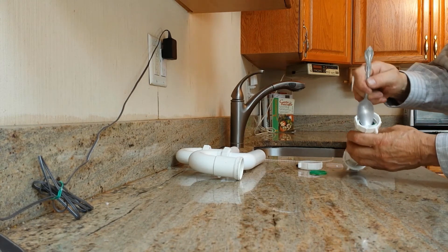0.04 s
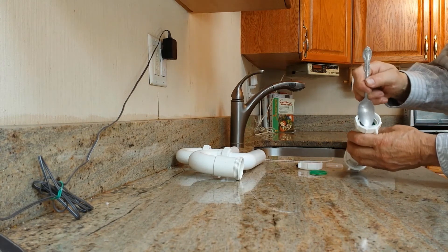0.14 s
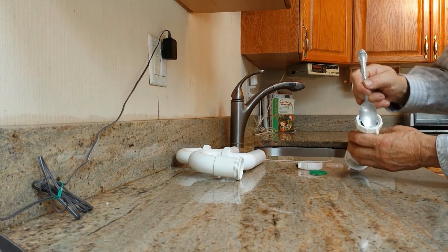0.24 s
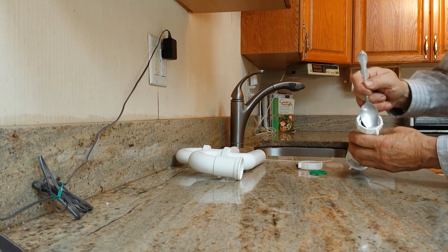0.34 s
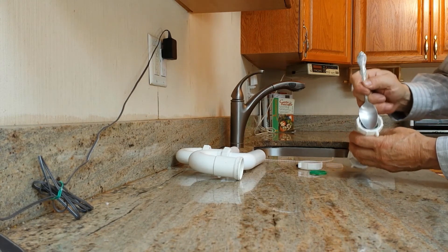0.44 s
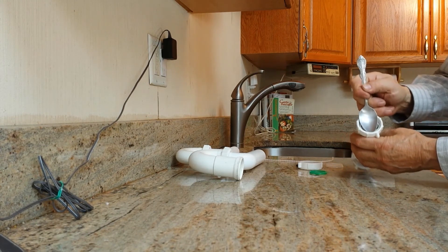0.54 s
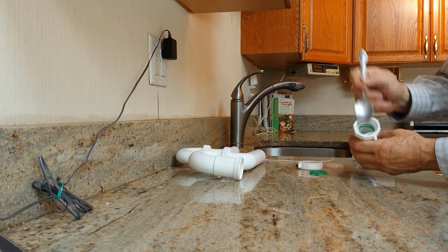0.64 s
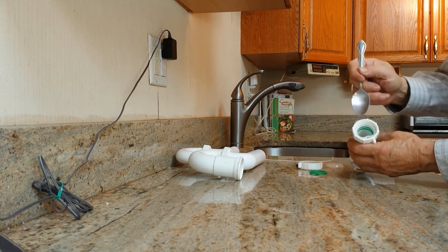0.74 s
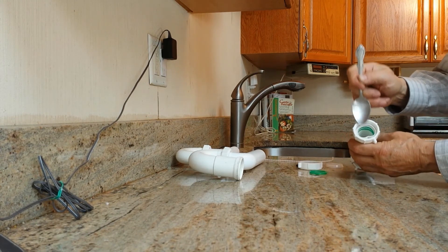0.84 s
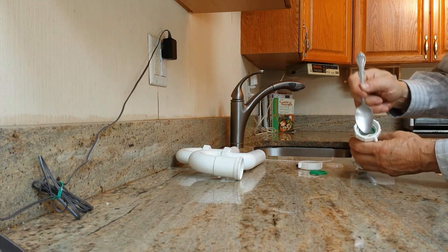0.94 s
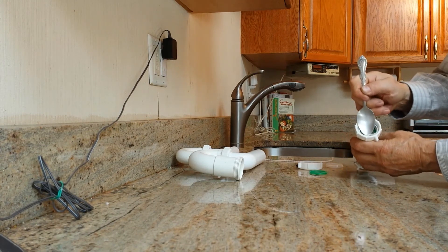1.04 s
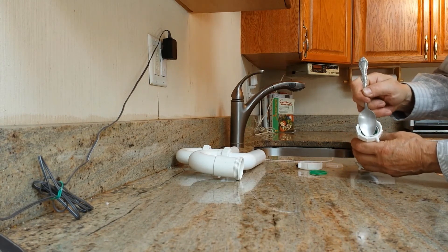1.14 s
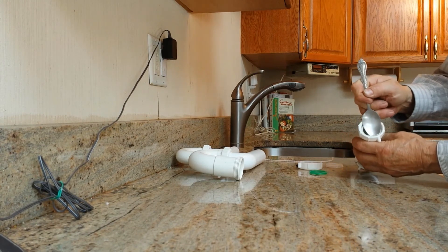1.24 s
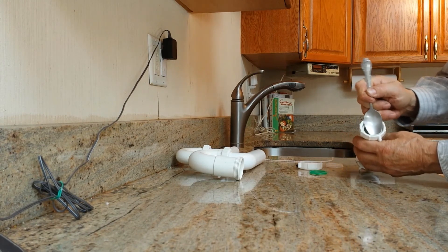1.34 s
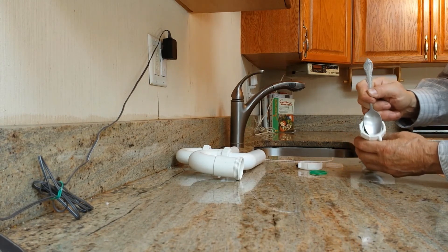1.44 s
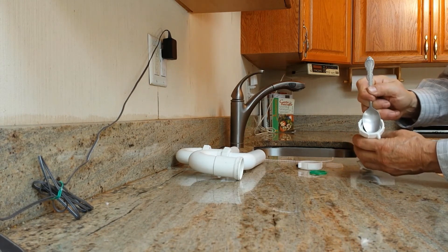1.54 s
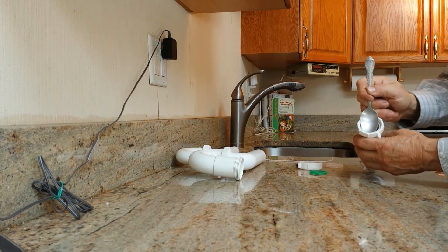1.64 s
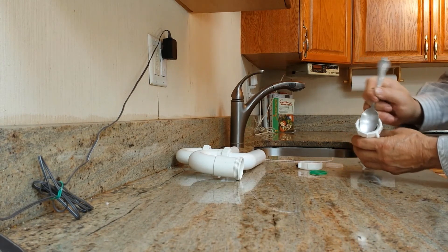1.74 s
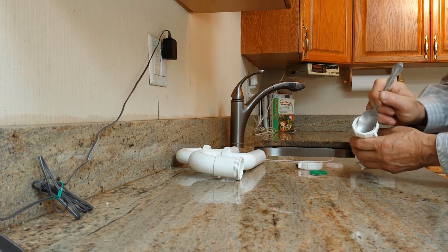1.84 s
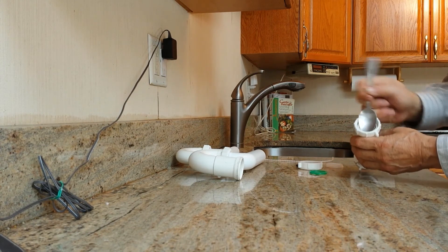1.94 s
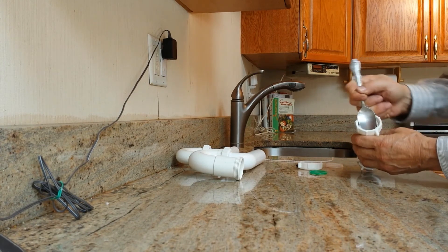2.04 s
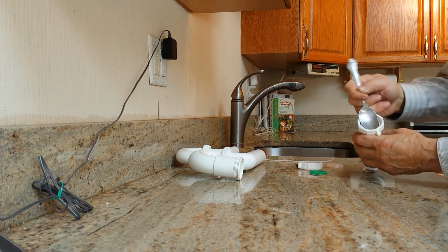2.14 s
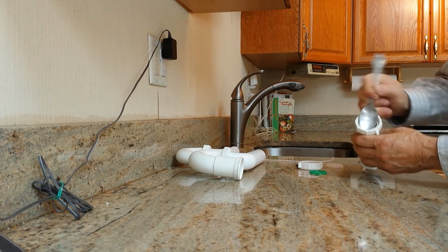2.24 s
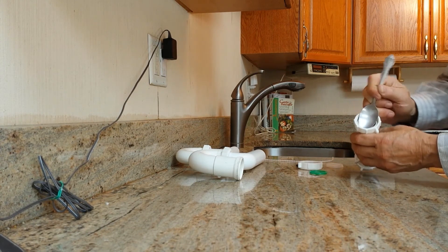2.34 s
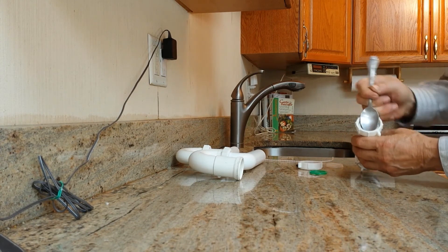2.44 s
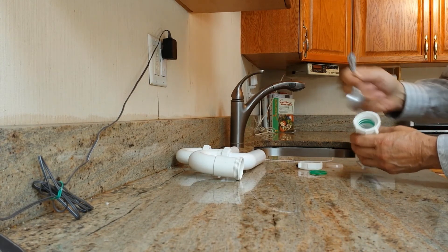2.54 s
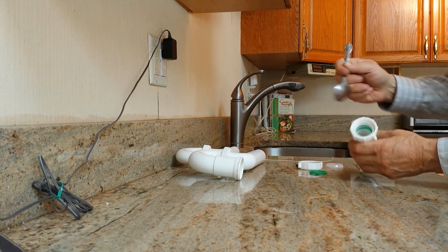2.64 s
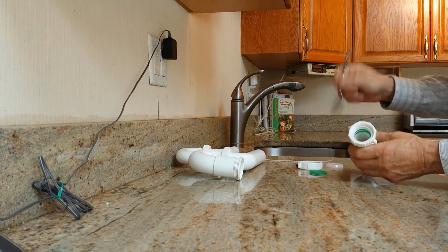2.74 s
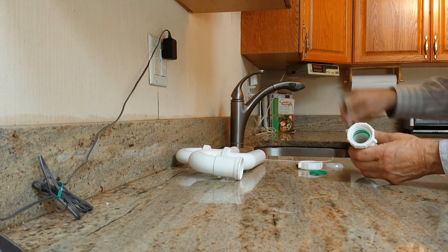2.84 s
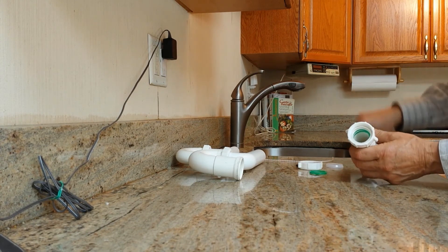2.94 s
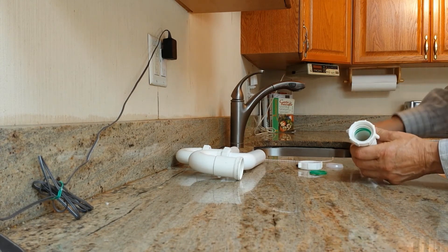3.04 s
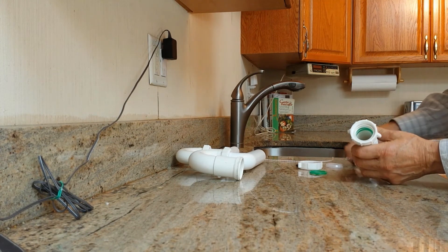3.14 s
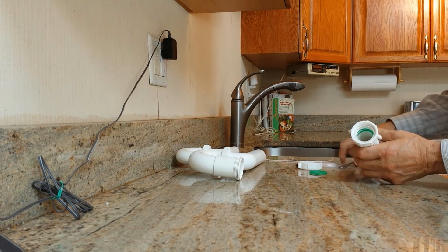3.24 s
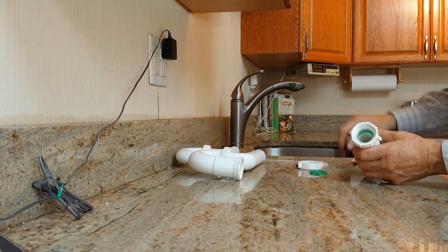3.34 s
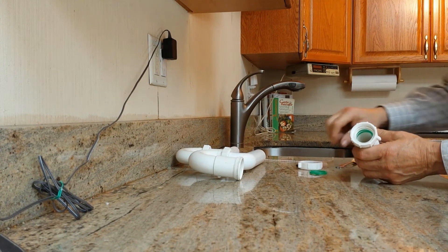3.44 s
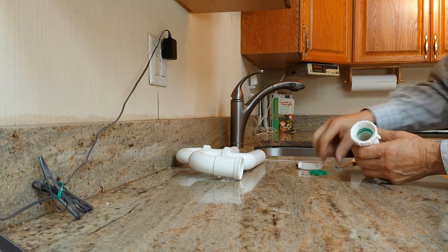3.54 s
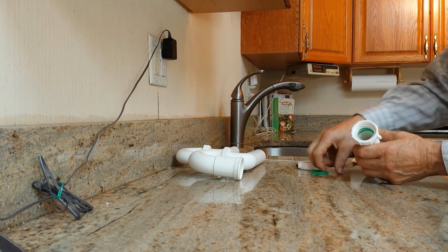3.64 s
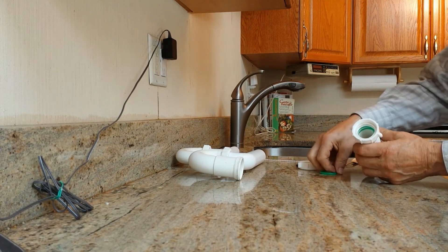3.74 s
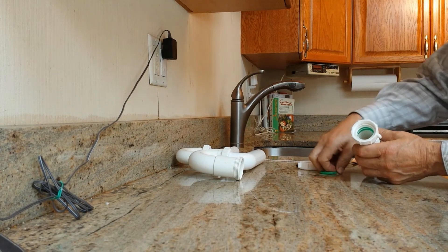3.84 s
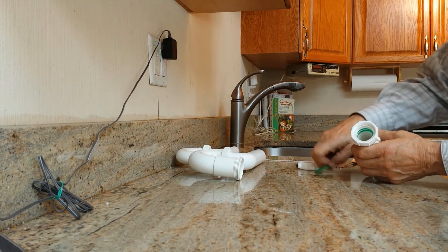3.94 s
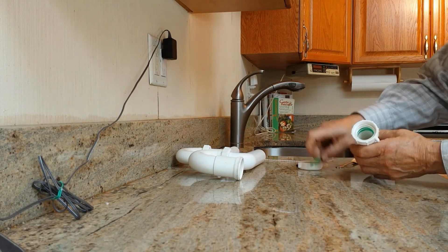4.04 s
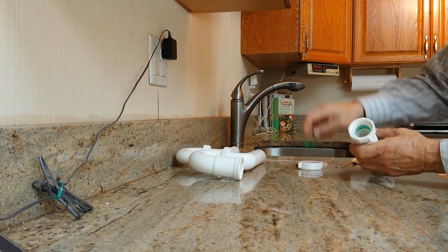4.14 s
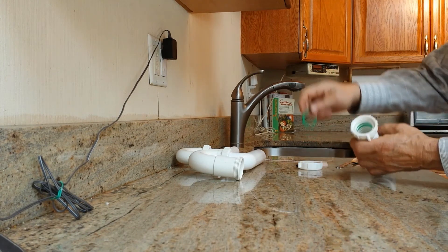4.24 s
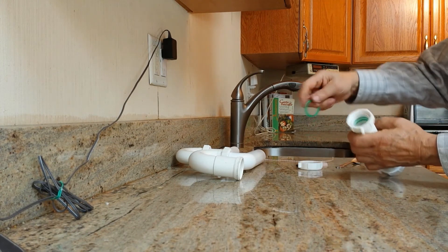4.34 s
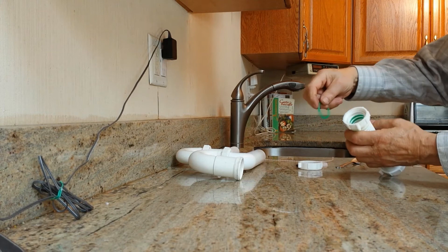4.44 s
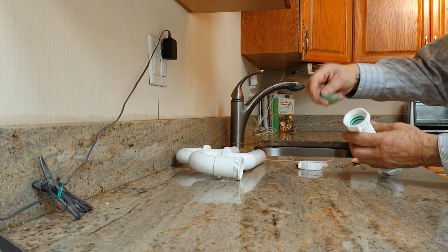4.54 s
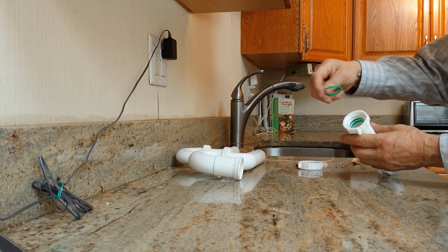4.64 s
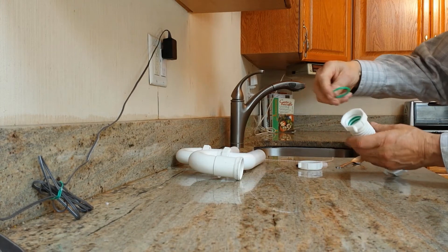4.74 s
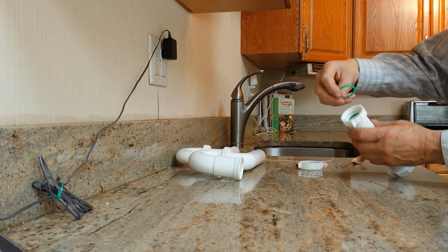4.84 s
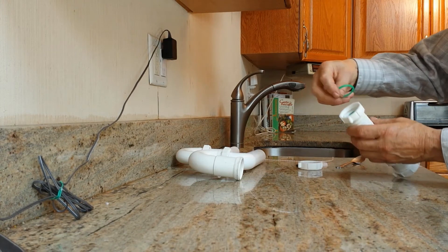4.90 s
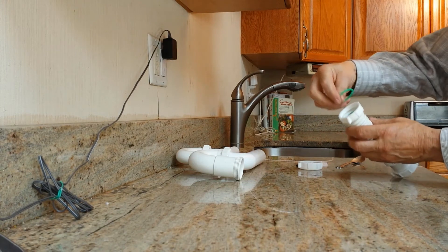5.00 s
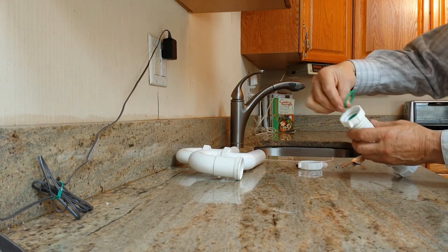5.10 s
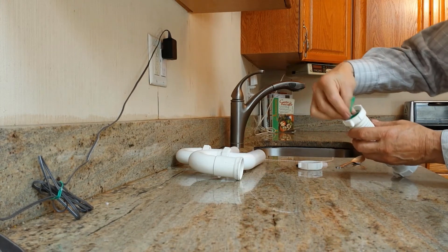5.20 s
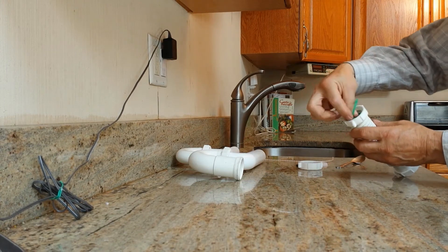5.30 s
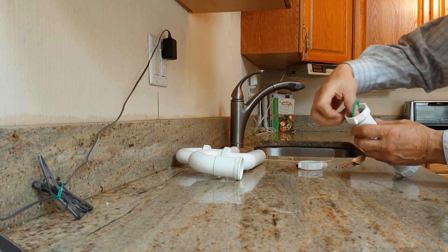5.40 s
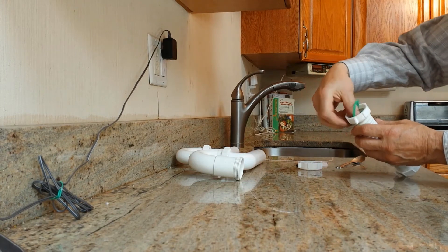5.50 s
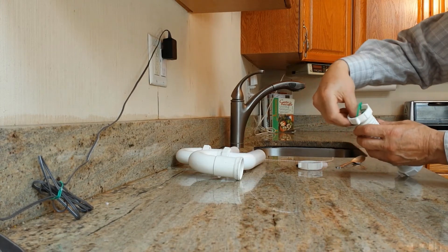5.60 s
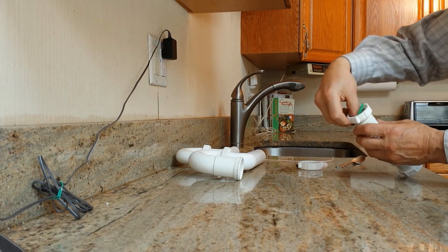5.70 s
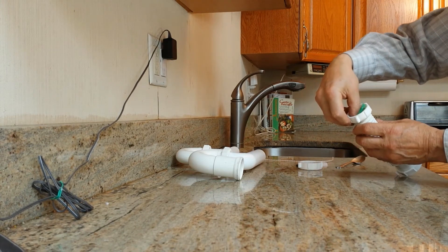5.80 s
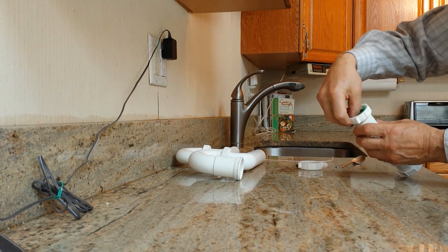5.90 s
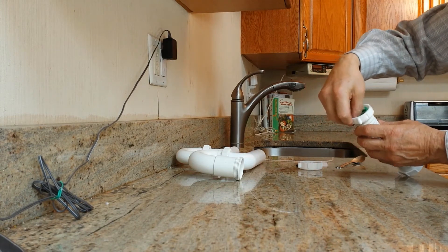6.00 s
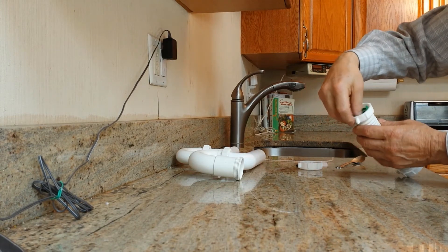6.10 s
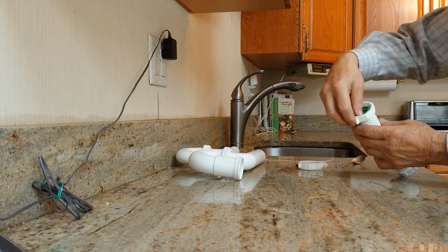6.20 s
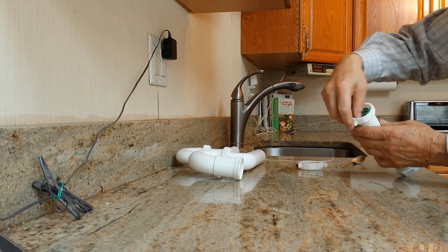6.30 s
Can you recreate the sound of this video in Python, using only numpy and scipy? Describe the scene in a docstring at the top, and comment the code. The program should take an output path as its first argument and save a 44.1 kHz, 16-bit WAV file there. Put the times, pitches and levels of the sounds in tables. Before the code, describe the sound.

Small plastic ticks and a sharp early click come from a hand-held pipe fitting, followed by boomy knocks and a snap. A steel spoon bounces on the stone counter, its rattle swelling and stopping quickly with a thin high ring. Sparse handling follows, then a hard, dry snap, the loudest sound. Short dense kitchen echoes, soft air noise and low appliance hum; microphones about a metre to the left.

```python
"""Granite kitchen counter, small hard room, a stereo pair of microphones about a metre to the left.
A spoon picks at the washer in a plastic drain fitting: tiny slips ring the plastic wall and the air in the pipe.
Dull knocks boom in a hollow body; the spoon, laid on the stone, bounces, rattles and rings as decaying sines.
Plastic snaps crack at once, loudest when the washer seats. Fingers tick faintly on the plastic.
Behind it all: dense echoes made of decaying noise, steady air noise and a low, wavering appliance hum."""
import sys
import numpy as np
from scipy import signal
from scipy.fft import rfft, irfft
from scipy.io import wavfile
from scipy.ndimage import uniform_filter1d

SR = 44100
rng = np.random.default_rng(int(sys.argv[2]) if len(sys.argv) > 2 else 0)


def inscribe(sig):
    """Save sig as 16-bit PCM at rate SR to the path in sys.argv[1].

    A 1-D sig is mono; a 2-D sig holds one channel per row.
    Samples are clipped to [-1, 1] before scaling.
    """
    pcm = np.round(np.clip(np.atleast_2d(sig).T, -1, 1) * 32767)
    wavfile.write(sys.argv[1], SR, pcm.astype(np.int16))


N = 280476  # length in samples
RING_T = np.arange(int(0.7 * SR)) / SR  # time axis of every ring and echo, s

# broad resonances of the plastic wall: f/Hz, width/Hz
LOW_WALL, HIGH_WALL = (2230, 1500), (5790, 2060)

# taps on the fitting: t/s, level/dB, brightness/(dB per octave), air ring f/Hz, air ring level/dB re the tap
FITTING_TAPS = [(0.258, -28.5, -6, 1600, -10), (0.4581, -23.5, 3, 1560, -21), (0.5179, -9, 4, 767, -17),
                (0.5187, -2, 1.5, 1537, -7.5), (0.9445, -27.5, -12.5, 1557, -2),
                (1.042, -20.5, 5, 1580, -25), (1.283, -25.5, 0, 760, -27), (1.459, -29.5, 5, 785, -24),
                (1.6075, -20.5, -3, 775, -17), (1.97, -30.5, -3, 750, 6.5), (6.1008, -24.5, -5, 493, 7)]
# spectrum of plastic slipping, also heard in the snaps and fingers: f/Hz, level/dB
SLIP_SPECTRUM = [(150, -24), (600, -15.5), (1500, -2), (2500, 2), (3600, -3.5), (5000, 6.5), (7000, 10),
                 (10000, 1), (13000, 0.5), (16000, -6.5)]


def fitting(slip_s=0.0005, slip_doubles_db=12, slip_db=-4.5, low_wall_db=-3.5, high_wall_db=0.5):
    """Each tap is a slip, longer when soft, that rings wall and air; a bright one favours the upper resonance."""
    out = np.zeros(N)
    for s, db, tilt, air_hz, air_db in FITTING_TAPS:
        # slip_s holds for a tap at 0 dB and doubles for every slip_doubles_db below that
        contact = slips(slip_s * 2 ** (-db / slip_doubles_db), after_db=7.5, count=40)
        tap = amp(slip_db) * unit(signal.fftconvolve(contact, pulse(SLIP_SPECTRUM, tilt)))
        for wall_db, (hz, width) in ((low_wall_db, LOW_WALL), (high_wall_db, HIGH_WALL)):
            tilted_db = wall_db + tilt * np.log2(hz / 4000)
            tap[:len(contact)] += amp(tilted_db) * unit(resonate(contact, hz, width))
        add(out, s, amp(db) * unit(tap))
        add(out, s, amp(db + air_db) * air_ring(air_hz))
    return out


# plastic catches and snaps free, loudest when the washer seats: t/s, level/dB, brightness/(dB per octave)
PLASTIC_SNAPS = [(1.945, -29, -2.5), (2.5659, -16, -4), (2.6548, -8, 3.5), (5.4109, -24, 0.5),
                 (5.8875, 5.5, 1.3)]


def snaps(slip_s=0.0024, wall_db=-18.5, air_hz=750, air_db=-19.5):
    """Plastic lets go all at once: a wide crack, with a little of the wall and the air behind it."""
    out = np.zeros(N)
    for s, db, tilt in PLASTIC_SNAPS:
        contact = slips(slip_s, after_db=2.5, count=120)
        crack = unit(signal.fftconvolve(contact, pulse(SLIP_SPECTRUM, tilt)))
        add(out, s, amp(db) * crack)
        add(out, s, amp(db + wall_db) * unit(resonate(contact, *LOW_WALL)))
        add(out, s, amp(db + air_db) * air_ring(air_hz))
    return out


# dull knocks on the counter: t/s, force level/dB
COUNTER_KNOCKS = [(0.7469, -12.5), (1.291, -22.5), (1.6052, -9.5), (2.2799, -21), (2.391, -10.5),
                  (2.6543, -3.5), (3.2221, -13), (4.2938, -12), (5.1603, -30)]
# modes of the hollow body that the knocks ring: f/Hz, level/dB, t60/s
HOLLOW_BODY = [(145.6, -7.5, 0.19), (165.3, -11, 0.32), (296.2, -1.5, 0.13), (362, 7, 0.045),
               (451.3, -5.5, 0.049), (509, -2.5, 0.16), (663, -5.5, 0.1215), (723, -3.5, 0.087),
               (838, -6.5, .09), (978, -0.5, 0.05), (1590, -17.5, 0.093)]
# spectrum of the knock's crack: f/Hz, level/dB
KNOCK_CRACK = [(50, -8.5), (160, 17.5), (1000, 3), (1280, -5.5), (1800, 3.5), (3500, -2.5), (6000, 1),
               (9000, -7.5), (16000, -12.5)]


def knocks(strike_point_db=2, crack_db=2, crack_growth=1.3, crack_tilt=-0.8, tilt_growth=0.11):
    """A blunt blow booms in the hollow body, each on a different spot; the crack grows faster than the boom."""
    out = np.zeros(N)
    hz, mode_db, t60 = np.transpose(HOLLOW_BODY)
    for s, force_db in COUNTER_KNOCKS:
        struck_db = mode_db + strike_point_db * rng.standard_normal(len(hz))
        boom = unit(ring(zip(hz, struck_db, t60), rise_s=0.000855))
        add(out, s, amp(force_db) * boom)
        # a harder knock cracks more and brighter; both growths are per dB of force
        contact = slips(0.0018, after_db=8.5, count=40)
        brightness = crack_tilt + tilt_growth * force_db  # dB per octave
        crack = unit(signal.fftconvolve(contact, pulse(KNOCK_CRACK, brightness)))
        add(out, s, amp(crack_db + crack_growth * force_db) * crack)
    return out


# modes of the steel spoon: f/Hz, level/dB struck at the bowl, level/dB struck at the handle, t60/s
SPOON_MODES = [(2794, -14, -20, .2), (3290, -18, -14, .2), (4322, -8, -14, .15), (4360, 0, -10, .2),
               (4406, -6, -13, .16), (6246, -8, -2, .22), (6415, 1, 1, .3), (7826, 0, -5, .2),
               (8607, -15, -10, .16), (10062, -15, -9, .15), (10518, -11, -7, .2), (11604, -20, 2, .18),
               (11982, -2, -8, .13), (14327, -18, 9, .12), (15290, -16, -2, .14)]


def spoon_ring(place, tilt, detune=0.0012):
    """The modes for a blow between bowl (0) and handle (1); the stone detunes them a little each time."""
    hz, bowl_db, handle_db, t60 = np.transpose(SPOON_MODES)
    db = (1 - place) * bowl_db + place * handle_db
    db = db + tilt * np.log2(hz / hz.mean())
    detuned_hz = hz * (1 + detune * rng.standard_normal(len(hz)))
    return ring(zip(detuned_hz, db, t60), rise_s=0.00048)


# bounces on the stone: t/s, level/dB, place (0 bowl - 1 handle), brightness/(dB per octave)
SPOON_BOUNCES = [(3.0918, -36, 0, -13), (3.0943, -22.5, 0.27, 3.5), (3.1432, -23, 0.033, 1),
                 (3.157, -33.5, 0.63, -2.5), (3.2674, -31, 0, -2.5), (3.2874, -20, 0.91, 1),
                 (3.3093, -26.5, 0.92, 12.5), (3.3377, -18.5, 0.69, 8), (3.374, -19, 0.34, 12),
                 (3.4225, -23, 0.72, 3.5)]
# rattle of each end after it lands: start t/s, loudest t/s, loudest level/dB, place (0 bowl - 1 handle)
SPOON_RATTLES = [(3.144, 3.171, -19, 0.037), (3.271, 3.399, -7.5, 0.79)]
# spectrum of steel on stone: f/Hz, level/dB
STONE_CLACK = [(60, -17), (200, -5), (500, -7), (900, -5), (1500, -6), (2200, -3.5), (3000, 3.5),
               (3800, -1), (5000, 4.5), (7000, 3.5), (9500, -2.5), (13000, -27.5), (16000, -12)]


def spoon(bowl_clack_db=24.5, handle_clack_db=15.5, clack_tilt_share=0.46, touches_per_s=180,
          rise_db_per_s=84, fall_db_per_s=250.5, rattle_ring_db=-22, scatter_db=3.0, count=52, size=12):
    """The bowl lands first, the handle follows, each rattles to rest; every touch clacks and feeds the ring."""
    rings, clacks = np.zeros(N), np.zeros(N)
    for s, db, place, tilt in SPOON_BOUNCES:
        add(rings, s, amp(db) * spoon_ring(place, tilt))
        clack_db = db + np.interp(place, [0, 1], [bowl_clack_db, handle_clack_db])
        contact = slips(0.003, after_db=8.5, count=24)
        blow = unit(signal.fftconvolve(contact, pulse(STONE_CLACK, clack_tilt_share * tilt)))
        add(clacks, s, amp(clack_db) * blow)
    clack = unit(pulse(STONE_CLACK))
    for start, loudest, top_db, place in SPOON_RATTLES:
        detuned = [spoon_ring(place, 0) for _ in range(size)]  # reused in turn
        touches = start + (np.arange(count) + rng.random(count)) / touches_per_s
        for k, s in enumerate(touches):
            drop_db = max(rise_db_per_s * (loudest - s), fall_db_per_s * (s - loudest))
            db = top_db - drop_db + scatter_db * rng.standard_normal()
            add(rings, s, amp(db + rattle_ring_db) * detuned[k % size])
            add(clacks, s, amp(db) * signal.fftconvolve(slips(0.003, after_db=1.0), clack))
    return rings, clacks


def fingers(db=-48, scatter_db=3, tilt=-6, count=24):
    """Faint dull ticks of skin and sleeve on the plastic, at random times."""
    out = np.zeros(N)
    times = rng.random(count) * N / SR
    for s, size in zip(times, rng.standard_normal(count)):
        contact = slips(0.014, after_db=4.5, count=30)
        tick = unit(signal.fftconvolve(contact, pulse(SLIP_SPECTRUM, tilt)))
        add(out, s, amp(db + scatter_db * np.tanh(size)) * tick)
    return out


# echoes of the kitchen: f/Hz, t60/s, reverberant level/dB
KITCHEN_ECHOES = [(100.5, 0.37, 1.5), (251, 0.47, 3.5), (696, 0.4, 6), (1832, 0.44, -1.5),
                  (4940, 0.43, 3.5), (8000, 0.42, 2.5), (15140, 0.31, 3)]


def kitchen_tail(build_s=0.0034, early_db=-2, early_t60=0.076, size=14):
    """Quick echoes from counter and cupboards, then dense wall echoes that die away band by band."""
    hz = np.fft.rfftfreq(len(RING_T), 1 / SR)
    noise = rfft(rng.standard_normal(len(RING_T)))
    centres, tail = np.geomspace(80, 16000, size), 0
    for centre, share in zip(centres, np.eye(size)):
        # each band overlaps its neighbours as a triangle on the log-frequency axis
        band = irfft(noise * along(np.c_[centres, share], hz), len(RING_T))
        late = fade(RING_T, along(KITCHEN_ECHOES, centre))
        decay = late + amp(early_db) * fade(RING_T, early_t60)
        envelope = unit(decay * (1 - np.exp(-RING_T / build_s)))
        tail = tail + amp(along(KITCHEN_ECHOES, centre, axis=2)) * band * envelope
    return tail


# left microphone against the right: f/Hz, level/dB
LEFT_COLOUR = [(100, 2.5), (300, -1), (600, 2), (2000, 6.5), (4800, -1), (6500, -3), (9000, -4.5),
               (12000, -4.5), (15000, -31)]


def kitchen(sources, left_lag_s=0.0002, left_direct_db=-7.5, shared_hz=400):
    """Direct sound from the right plus the room; the close microphones share the room's long waves."""
    direct = sum(sound for sound, _ in sources)
    sent = sum(amp(room_db) * sound for sound, room_db in sources)
    low = signal.butter(2, shared_hz, fs=SR, output="sos")
    high = signal.butter(2, shared_hz, "high", fs=SR, output="sos")
    bass = signal.sosfilt(low, kitchen_tail())
    left_tail, right_tail = (bass + signal.sosfilt(high, kitchen_tail()) for _ in range(2))
    left = signal.fftconvolve(sent, left_tail)[:N]
    right = signal.fftconvolve(sent, right_tail)[:N]
    add(left, left_lag_s, amp(left_direct_db) * direct)  # before the left microphone's colour
    left = signal.fftconvolve(left, pulse(LEFT_COLOUR))[:N]
    return np.array([left, right + direct])


# spectrum shape of the quiet room's air: f/Hz, relative level/dB per Hz
AIR_SPECTRUM = [(15, -64.5), (25, -35.5), (43, -12.5), (110, -6.5), (140, -7.5), (215, -5), (240, -16),
                (267, -12), (378, -13.5), (567, -19.5), (804, -22), (1080, -29), (5140, -35), (6380, -30.5),
                (15500, -39.5)]
# side of the air noise against its mid, before a small lift: f/Hz, level/dB
AIR_SIDE = [(60, -15.5), (110, -11), (200, -13.5), (380, -5), (700, -5), (1290, 0.5), (2380, -2.5),
            (4400, 1), (8120, -1.5), (15000, 2)]
# appliance hum before swell and waver: f/Hz, level/dB
APPLIANCE_HUM = [(60, -72.5), (105, -71.5), (140, -61.5), (277, -71.5), (409, -72)]
# how the hum swells and sinks: t/s, level/dB
HUM_LEVEL = [(0, 6.5), (1.2, -5.5), (3, 5), (4.1, 3.5), (4.8, -4.5), (5.6, -3), (6.3, 0)]


def quiet_room(mid_db=-59, side_lift_db=0.5, left_db=-0.7, waver_db=3.5, drift=0.35, apart=0.3256):
    """Shaped air noise under sines whose level and phase wander, the phase partly opposite in each microphone."""
    hz = np.fft.rfftfreq(N, 1 / SR)
    mid, side = (rfft(rng.standard_normal(N)) * amp(along(AIR_SPECTRUM, hz)) for _ in range(2))
    mid = irfft(mid, N)
    side = irfft(side * amp(along(AIR_SIDE, hz) + side_lift_db), N)
    air = amp(mid_db) / mid.std() * np.array([mid + side, mid - side])
    t, hum = np.arange(N) / SR, 0
    swell_db = np.interp(t, *np.transpose(HUM_LEVEL))
    for f, db in APPLIANCE_HUM:
        opposite = apart * walk(3.3) * np.array([[1], [-1]])
        phase = 2 * np.pi * f * t + drift * walk(13) + opposite  # drift and apart in radians
        hum = hum + amp(db + swell_db + waver_db * walk(6.3)) * np.sin(phase)
    return (air + hum) * amp([[left_db / 2], [-left_db / 2]])


def slips(length, after_db, count=14):
    """One contact, then a dying spray of tiny slips with a mean lag of length seconds."""
    lags = rng.exponential(length, count).clip(0, 0.03)
    spray = np.zeros(len(RING_T) // 20)
    np.add.at(spray, (lags * SR).astype(int), rng.standard_normal(count))
    spray = amp(after_db) * unit(spray)
    spray[0] += 1
    return unit(spray)


def resonate(x, hz, width):
    """A broad resonance, applied twice for steep skirts."""
    b, a = signal.iirpeak(hz, hz / width, fs=SR)
    return signal.lfilter(b, a, signal.lfilter(b, a, x))


def air_ring(hz, t60=0.05):
    """The air in the pipe rings briefly, at a pitch set by how fingers and spoon cover the mouth."""
    return unit(ring([(hz, 0, t60)], rise_s=0.001))


def ring(modes, rise_s):
    """Decaying sines from rows (Hz, dB, t60 s); the push takes a moment and neighbours start in opposite senses."""
    total = 0
    for k, (hz, db, t60) in enumerate(modes):
        total = total + (-1) ** k * amp(db) * fade(RING_T, t60) * np.sin(2 * np.pi * hz * RING_T)
    return total * (1 - np.exp(-RING_T / rise_s))


def pulse(spectrum, tilt=0, size=1024):
    """The shortest causal (minimum-phase) pulse with the given spectrum, tilted by some dB per octave."""
    hz = np.fft.rfftfreq(size, 1 / SR)
    # the tilt pivots at 4 kHz and stays level below 1 kHz
    db = along(spectrum, hz) + tilt * np.log2(np.maximum(hz, 1000) / 4000)
    cepstrum = irfft(np.log(amp(db)))
    cepstrum[1:size // 2] *= 2  # fold the acausal half onto the causal one
    cepstrum[size // 2 + 1:] = 0
    return irfft(np.exp(rfft(cepstrum)))


def walk(rate):
    """Slow random wander with a spread near one, taking rate new values a second."""
    k = int(SR / rate)
    steps = np.repeat(rng.standard_normal(N // k + 1), k)
    return np.sqrt(2) * uniform_filter1d(uniform_filter1d(steps, k), k)[:N]


def fade(t, t60):
    """Exponential decay by 60 dB in t60 seconds."""
    return np.exp(-np.log(1000) * t / t60)


def along(table, hz, axis=1):
    """Read one column of a table on a log-frequency axis."""
    rows = np.array(table)
    return np.interp(np.log(np.maximum(hz, 1)), np.log(rows[:, 0]), rows[:, axis])


def amp(db):
    """Decibels to gain."""
    return 10 ** (np.asarray(db) / 20)


def unit(x):
    """Scale to an energy of one."""
    return x / np.sqrt(np.sum(x ** 2))


def add(track, s, sound):
    """Mix a sound into a track at a time in seconds."""
    start = int(s * SR)
    track[start:start + len(sound)] += sound[:N - start]


def scene():
    """Everything handled at the counter sounds through the kitchen, over the quiet room."""
    rings, clacks = spoon()
    # (sound, level sent to the room in dB)
    sources = [(fitting(), -3.5),
               (snaps(), -1.5),
               (knocks(), -3.0),
               (rings, -5.0),
               (clacks, 1.5),
               (fingers(), -1.5)]
    return kitchen(sources) + quiet_room()


def record(dry, top_hz=15800):
    """A steep elliptic low-pass cuts the top of the treble."""
    return signal.sosfilt(signal.ellip(10, 0.2, 80, top_hz, fs=SR, output="sos"), dry)


dry = scene()
out = record(dry)
inscribe(out)
```